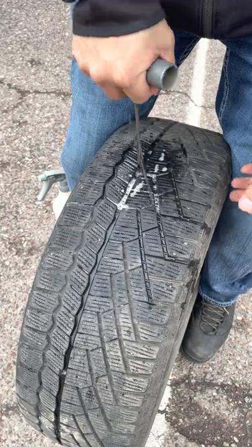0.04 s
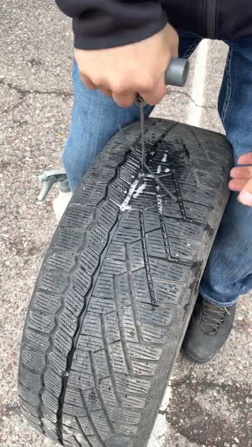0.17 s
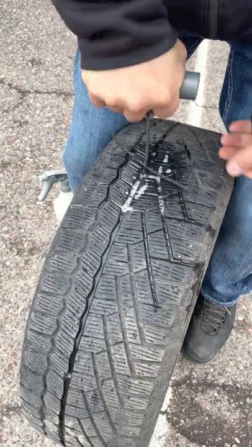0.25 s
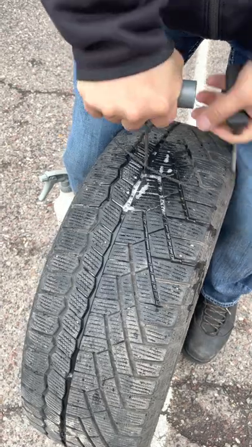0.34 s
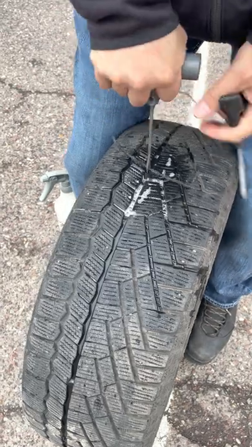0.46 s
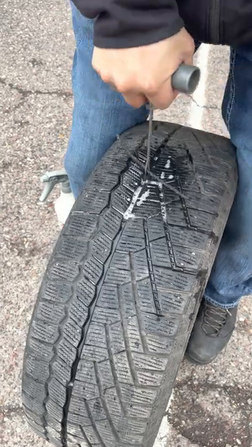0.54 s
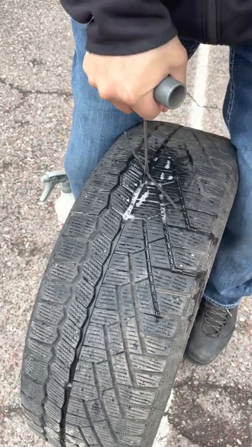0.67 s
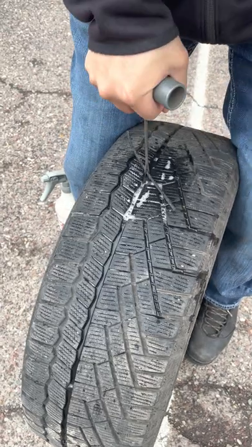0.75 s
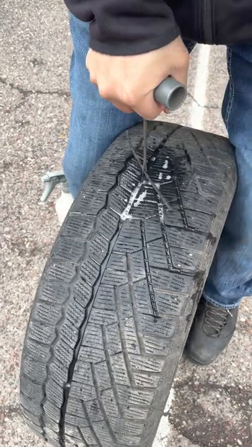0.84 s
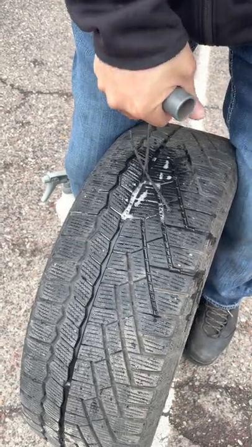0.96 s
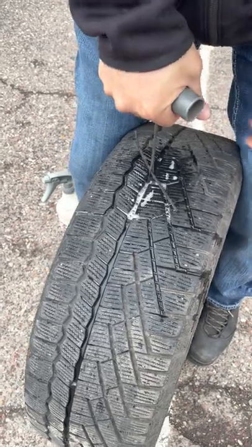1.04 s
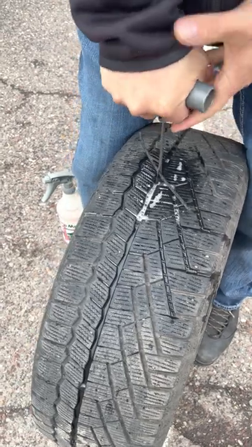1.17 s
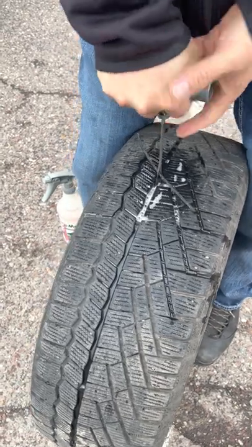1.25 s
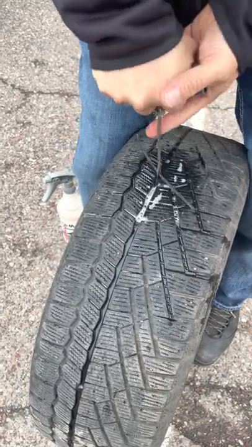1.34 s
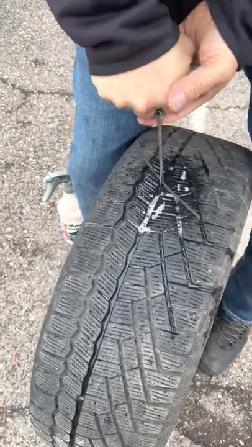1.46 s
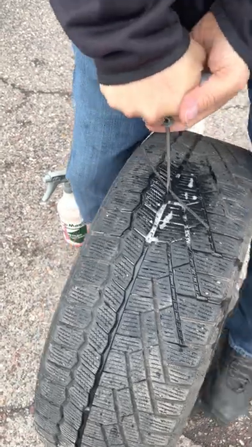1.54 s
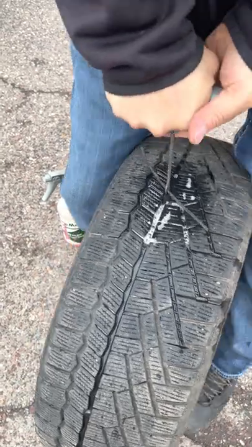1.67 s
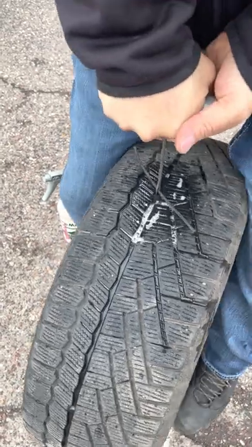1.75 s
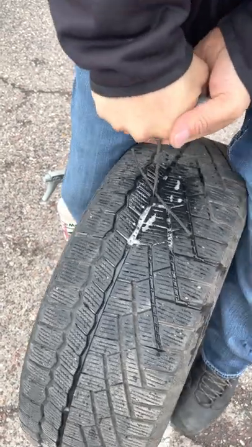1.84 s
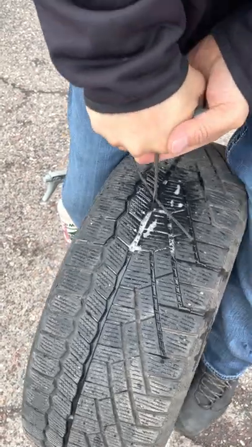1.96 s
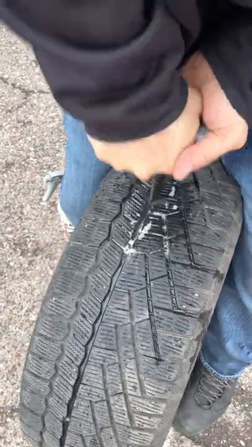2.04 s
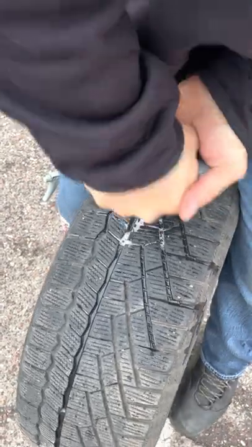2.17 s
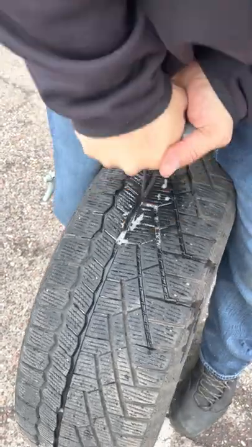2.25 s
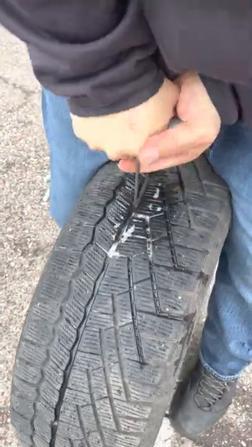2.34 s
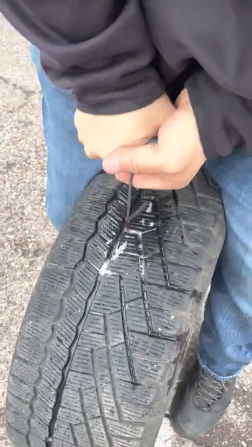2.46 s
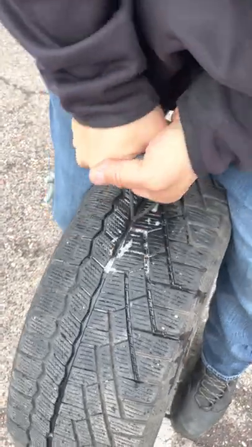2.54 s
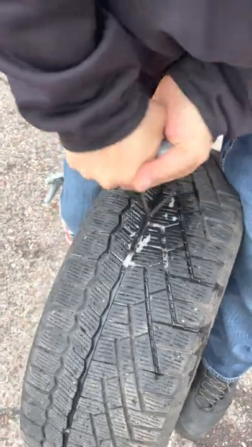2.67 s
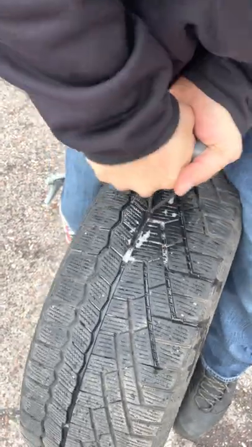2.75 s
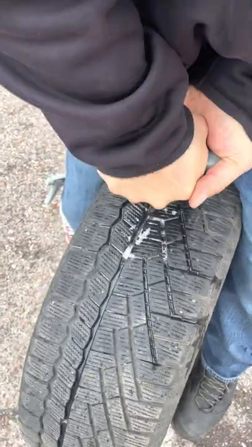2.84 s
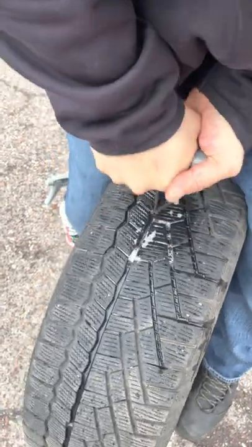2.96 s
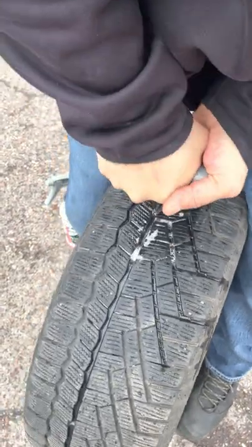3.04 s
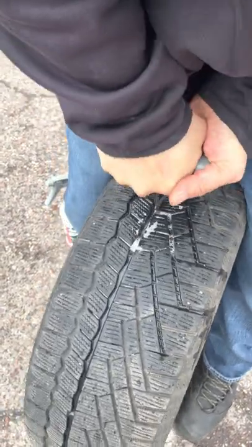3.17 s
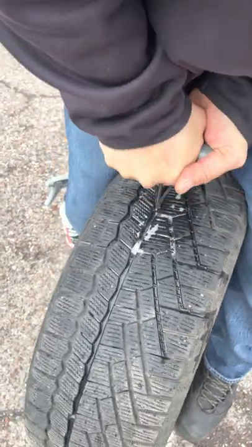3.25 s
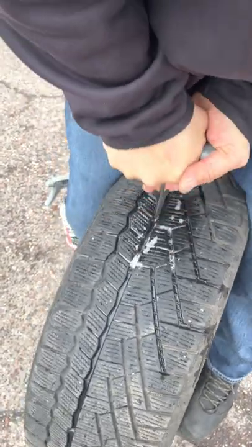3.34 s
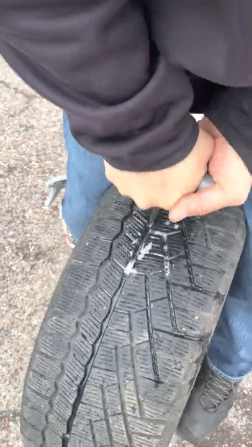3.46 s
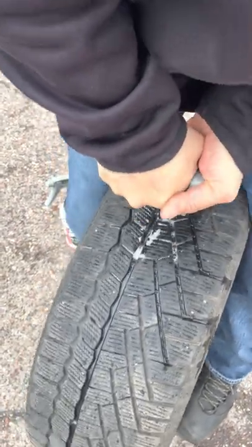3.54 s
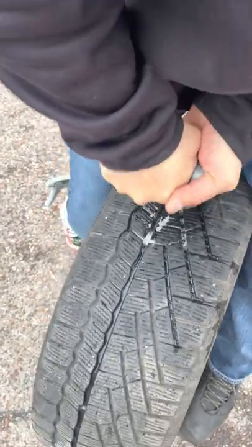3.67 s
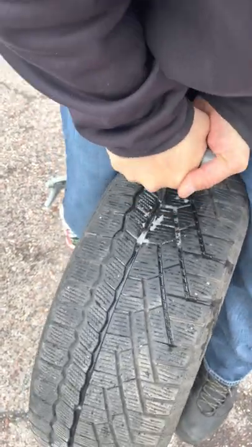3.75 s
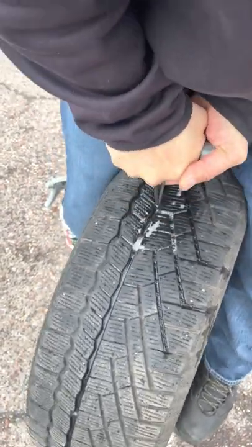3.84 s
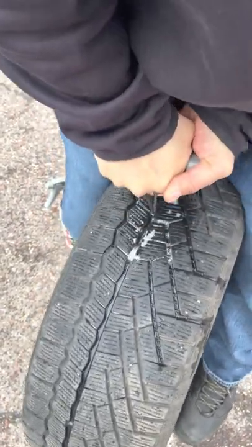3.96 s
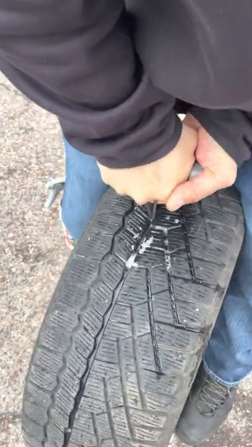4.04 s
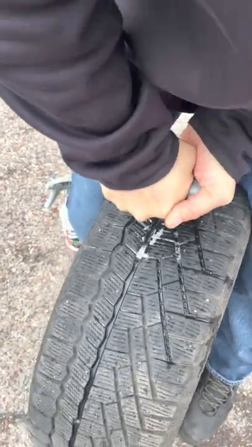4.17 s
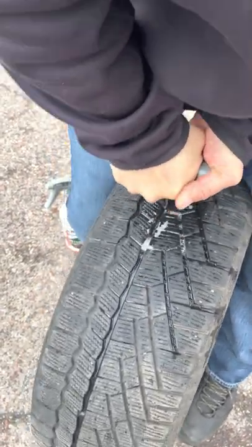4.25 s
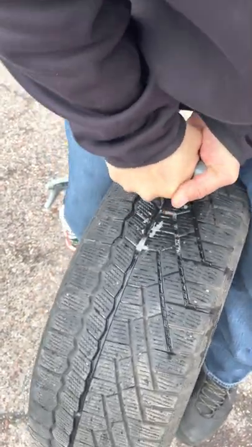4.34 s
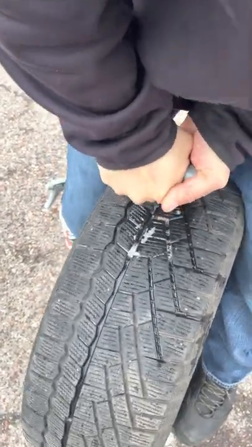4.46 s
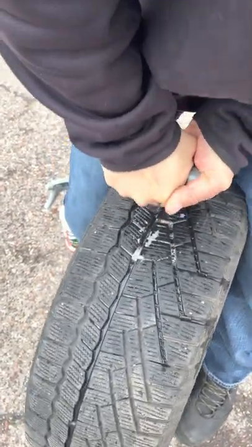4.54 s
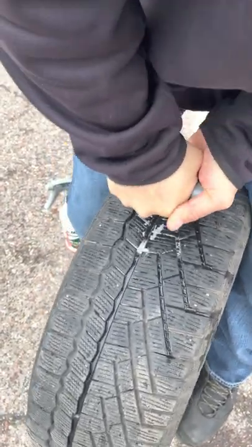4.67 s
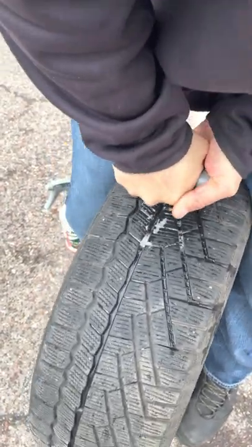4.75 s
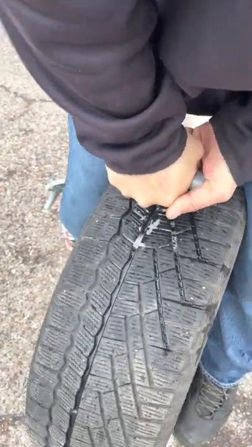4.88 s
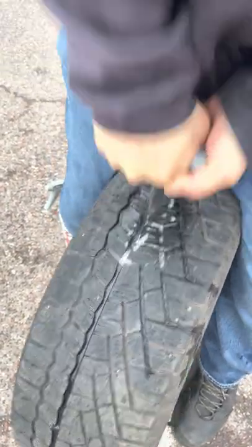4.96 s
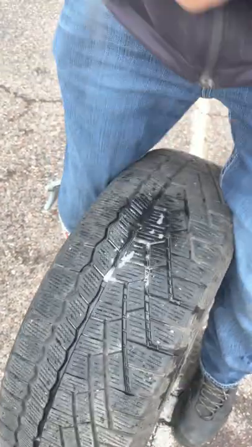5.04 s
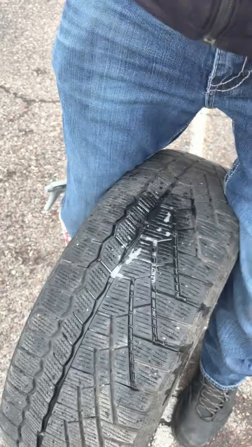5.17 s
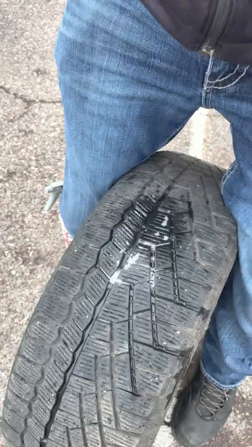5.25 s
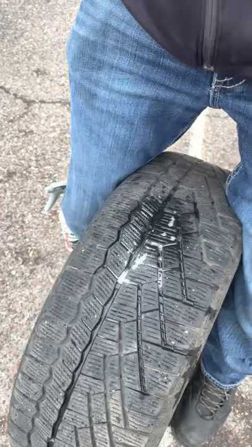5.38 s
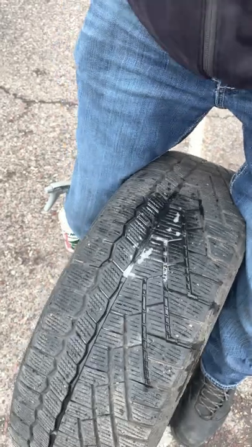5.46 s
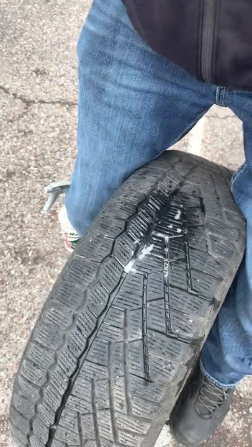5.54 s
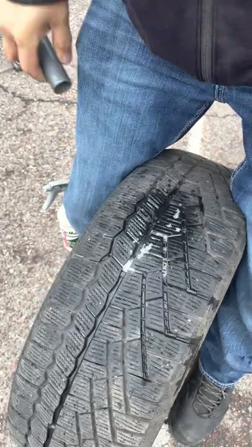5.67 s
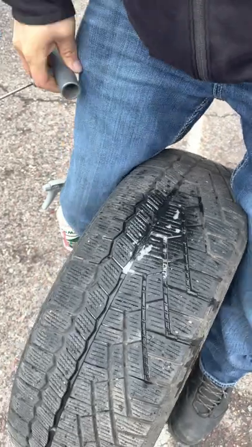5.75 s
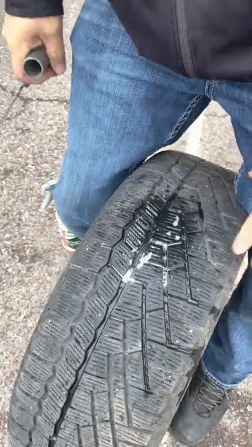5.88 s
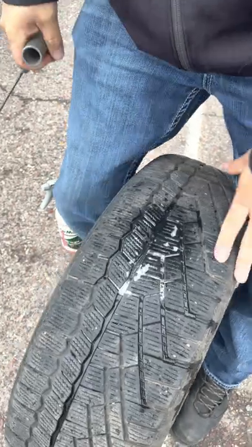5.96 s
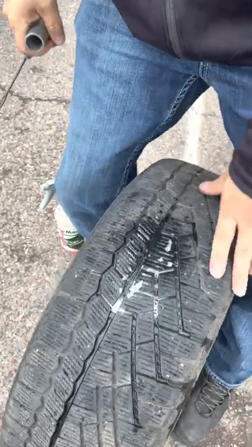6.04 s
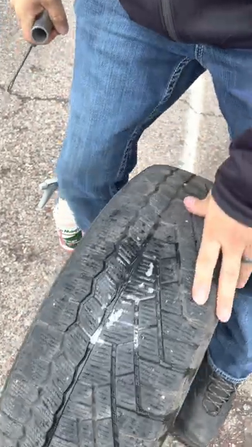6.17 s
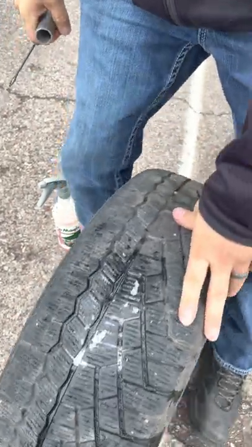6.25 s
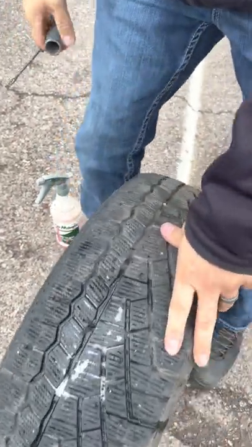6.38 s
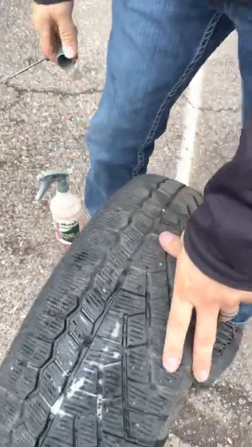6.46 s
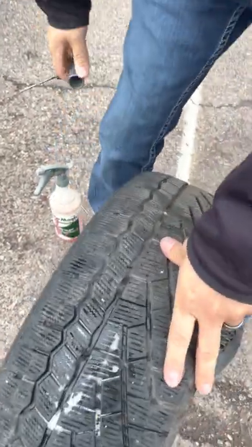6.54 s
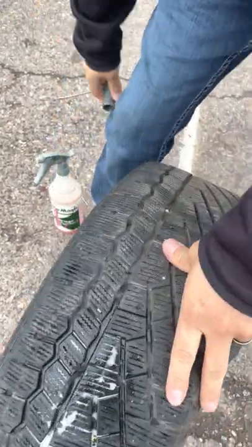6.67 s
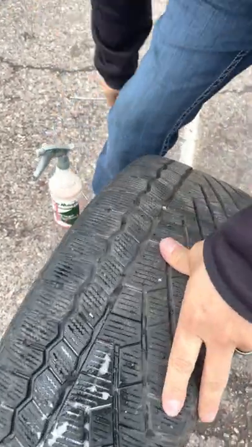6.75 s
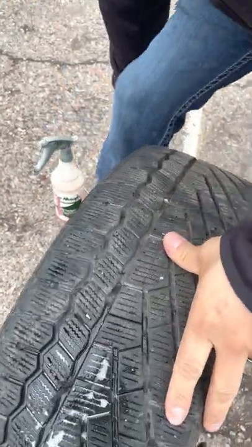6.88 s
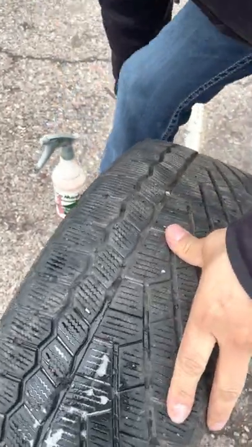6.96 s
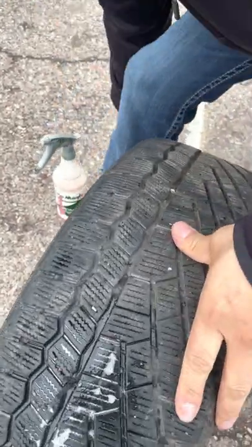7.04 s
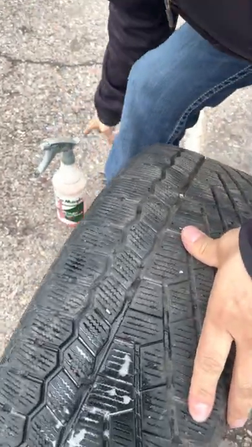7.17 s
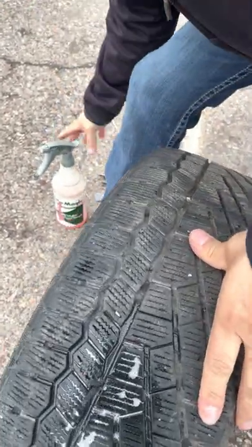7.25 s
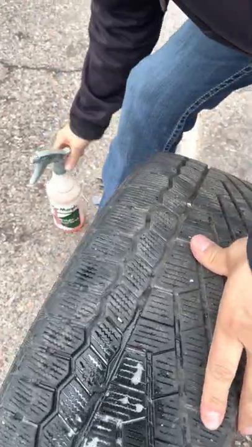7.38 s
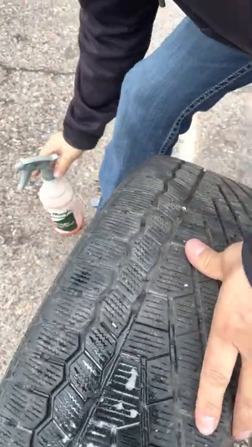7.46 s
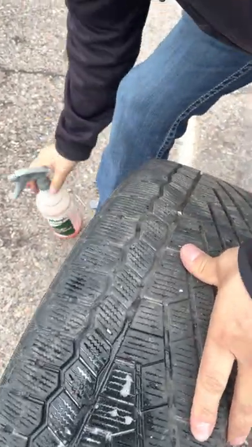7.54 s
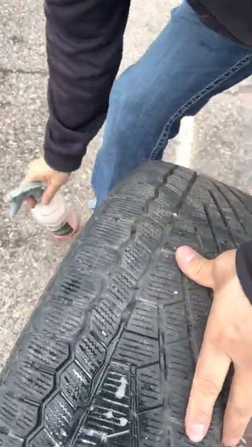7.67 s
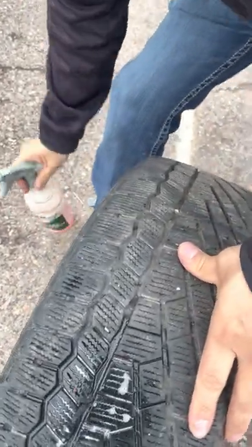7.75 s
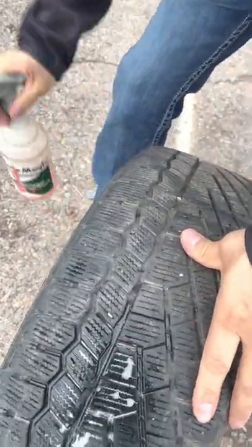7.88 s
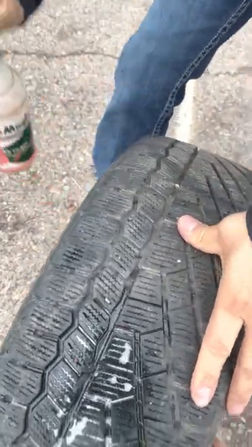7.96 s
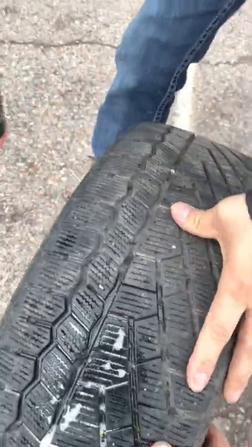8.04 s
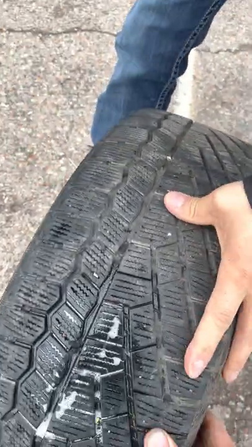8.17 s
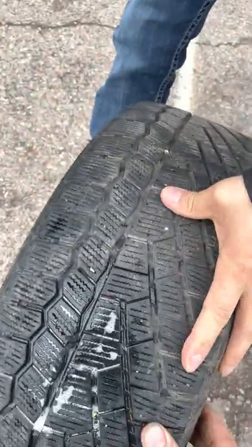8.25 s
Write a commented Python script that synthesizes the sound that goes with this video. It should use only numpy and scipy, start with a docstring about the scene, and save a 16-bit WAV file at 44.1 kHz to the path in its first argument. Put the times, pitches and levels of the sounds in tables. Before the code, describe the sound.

A handheld stereo phone picks up a tyre closely outdoors, its treble slightly phasey, over low distant traffic, a faint engine drone and soft air. From 0 to 2 s, bright pressurised air hisses and sputters unevenly through a wet hole, with dry ticks around 0.9 to 1.3 s. At 2.0 s a sharp wet spit and dull thump end the leak. Small knocks and tiny puffs come around 2.2 to 2.8 s, then near quiet, with a faint spit at 4.5 s. At 4.95 s the steel tool jerks free: a loud hollow pop, deep short boom and fading tyre hum, then a weak squeaky hiss until 5.2 s. A car's soft roar swells about 6.3 s, with a brief wind puff at 6.5 and a thin high whine rising. At 7.04 s the tool hits gritty asphalt, clanking and ringing high, bouncing until 7.5 s. A small plastic click comes at 8.25 s.

```python
"""Beside a punctured car tyre, with distant traffic: air hisses through the wet hole, a filtered noise jet,
until a plug is forced in at 2 s. Near 5 s the steel tool is yanked out: the hole pops, struck modes boom in the
tyre, and the closing hole hisses and squeals. A car, a swell of noise, passes 13.8 m away at 6.3 s; at 7 s the
tool drops on asphalt, a bank of ringing modes, and at 8.3 s a plastic bottle clicks.
The microphone is a hand-held phone with two ports whose treble arrives out of step."""
import sys
import numpy as np
from scipy import signal
from scipy.fft import rfft, irfft, next_fast_len
from scipy.io import wavfile
from scipy.ndimage import uniform_filter1d

SR = 44100
rng = np.random.default_rng(int(sys.argv[2]) if len(sys.argv) > 2 else 0)


def how_loud(loudness_db):
    """Turn decibels into a plain amplitude multiplier (0 dB gives 1, 20 dB gives 10)."""
    steps = np.asarray(loudness_db, float) / 20
    return 10 ** steps


def waveform_to_disk(signal):
    """Save audio, clipped to [-1, 1], as 16-bit WAV at the path in sys.argv[1]."""
    frames = np.transpose(np.atleast_2d(signal))
    scaled = np.clip(frames, -1, 1) * 32767
    samples = np.round(scaled).astype(np.int16)
    wavfile.write(sys.argv[1], SR, samples)


N = 366471
T, F = np.arange(N) / SR, np.fft.rfftfreq(next_fast_len(N), 1 / SR)  # time [s], frequency [Hz]
FFT_SIZE = len(F) * 2 - 2
SIDES = np.array([[1], [-1]])  # left and right port in opposite senses

# Far traffic swells, two stretches in a row: (time [s], level [dB])
TRAFFIC = [
    [(0.0, -54), (2.36, -57), (3.98, -53), (4.48, -53.5), (4.85, -52)],
    [(5.5, -50), (6.8, -49), (7.02, -48), (7.42, -48), (8.31, -48.5)],
]
# Spectrum of the traffic rumble: (frequency [Hz], relative density [dB])
RUMBLE = [(15, -43), (25, -36), (48, -5), (67, -8.5), (97, -9), (124, 2.5), (152, -5.5), (195, -6),
          (352, -15), (436, -14.5), (500, -21), (650, -79), (1100, -120)]
DEEP_DB, DRONE_DB = -4, 1  # rumble below and above 95 Hz, over the traffic level
# Distant engine: (time [s], firing frequency [Hz], level [dB])
ENGINE = [(0, 75.06, -48.5), (.8, 76, -54), (2.4, 80, -57), (3.3, 82.1, -57), (3.88, 80.9, -49.5),
          (4.4, 75.3, -67), (5.5, 65.3, -84), (6.6, 64.5, -62), (7.5, 66.3, -44.5), (8.31, 64.8, -50)]
OCTAVE_DB = -8.5  # octave over the firing tone
# Spectrum of the tyre roar on the road: (frequency [Hz], relative density [dB])
ROAR = [(150, -3.5), (300, -3.5), (600, 4.5), (1000, 2), (1500, -8.5), (2500, -14.5), (5000, -23)]
# nearest moment, distance, speed [m/s], and the roar when nearest, before its flutter and lean
CAR_PASSES_S, CAR_M, CAR_M_S, CAR_DB = 6.34, 13.8, 13.6, -54.5
FAR_ROAR_DB, ROAR_FLUTTER_DB = -77.5, 1.2
# Spectrum of the high whine: (frequency [Hz], relative density [dB])
WHINE = [(2500, -13.5), (3600, -6), (4500, 0), (5100, -5), (5900, -4.5), (7000, -42)]
# Spectrum of the fine tyre hiss that swells with the whine: (frequency [Hz], relative density [dB])
SPRAY = [(5500, -22), (7000, 5), (10000, -2.5), (13000, 2.5), (15500, -16)]
WHINE_FAR_DB, WHINE_NEAR_DB, WHINE_IN_S, WHINE_FADE_S = -67.5, -58, 6.65, 0.53
HUM_HZ, HUM_DB, HUM_IN_S, HUM_FADE_S = 440, -58.5, 6.5, 0.14
# Spectrum of the far hiss: (frequency [Hz], relative density [dB])
AIR = [(500, -32), (1500, 3), (4000, -5), (6500, 4), (10000, 8.5), (13000, 6.5), (15000, -5), (17000, -10)]
AIR_DB = -60.5
CAVITY_DB = -71
GUST_S, GUST_DB, GUST_HALF_S = 6.47, -34, 0.014  # wind across the ports: peak time, level, half length

# Dead modes of the plastic bottle: (frequency [Hz], level [dB])
SNAP = [(3810, -18), (3280, -25), (4700, -33), (5770, -29), (7450, -29)]
SNAP_S, SNAP_LENGTH_S = 8.2538, 0.00064

# Modes of the steel tool: (frequency [Hz], level [dB], t60 [s],
# part [0 handle, 1 shaft, 2 tip, 3 eye, 4 crossbar])
STEEL = [(8830, -2, .4, 0), (8907, 0, .45, 0), (9088, -5, .45, 0), (4729, 0, .27, 4), (3290, -14, .07, 4),
         (5764, -12, .4, 1), (5790, -4, .06, 1), (8498, 0, .3, 1), (14050, -14, .18, 1),
         (14700, -7, .17, 1), (15050, -14, .11, 1), (7390, -2, .12, 2), (9109, 7, .3, 2),
         (10400, -6, .07, 2), (6714, 0, .3, 3), (6760, -1, .05, 1)]
# Landing and bounces: (time [s], handle [dB], shaft [dB], tip [dB], eye [dB], crossbar [dB], grit [dB])
DROPS = [(7.044, -33, -46, -49, -60, -42, -36), (7.054, -32, -44, -49, -54, -23.5, -46),
         (7.177, -62, -64, -42, -54, -60, -50), (7.227, -40, -31, -43, -48, -60, -33),
         (7.367, -60, -37, -66, -35, -70, -45), (7.473, -80, -52, -64, -60, -80, -56)]
GRIT_S = 0.0094  # decay constant of the grit
TUMBLE_DB = 1.5  # spread of each ring's wavering
TWIN_HZ, TWIN_DB, TWIN_T60_S = 4745, -2.5, 0.099  # twin of the crossbar mode

# Dry ticks of tool, hands and grit:
# (time [s], level [dB], low ring [Hz], high ring [Hz], high ring over low [dB])
TICKS = [(.897, -31, 2310, 3600, -3), (.987, -37, 1740, 2900, 4), (.996, -27.5, 2020, 3020, -15),
         (1.259, -28, 4020, 2600, -21), (1.128, -42, 1930, 3200, 0), (2.4546, -35, 1320, 4980, 0),
         (2.506, -42.5, 1520, 2150, -4), (2.803, -42.5, 1400, 2440, -2), (3.25, -50, 3500, 4200, -6),
         (4.9605, -25, 1710, 2550, -17), (4.916, -38, 1530, 4000, -9), (7.044, -25, 1060, 2760, 2),
         (7.046, -29, 393, 1500, 10.5), (7.054, -17.5, 1234, 3130, -1), (7.056, -25.5, 414, 2100, -1),
         (7.178, -30, 1020, 2290, -4), (7.226, -30, 1110, 6460, 13), (7.306, -47, 1936, 3530, 2),
         (7.368, -49, 1070, 10070, 25)]
# crack level; crack top over the high ring: ratio for a -40 dB tick, and growth [octaves per dB]
CRACK_DB, CRACK_SPAN, CRACK_WIDER_PER_DB = -2.5, 2.4, .04

# Modes of the tyre: (frequency [Hz], level [dB], t60 [s], part [0 carcass and air ring, 1 tread])
TYRE = [(113, 0, .17, 0), (225.5, -16.5, 1.45, 0), (160, -4, .06, 0), (262, -10, .06, 0),
        (320, -4, .025, 1), (410, -2, .03, 1), (580, -2, .02, 1), (700, -3, .02, 1), (950, -4, .025, 1),
        (1300, -5, .02, 1), (1700, -4, .02, 1)]
# Blows to the tyre: (start time [s], carcass [dB], tread [dB], half length of the push [s])
THUMPS = [(0.899, -52, -36.5, 0.00046), (2.018, -66, -36, 0.00046), (2.028, -30.5, -34, 0.00036),
          (2.211, -62, -49.5, 0.00044), (2.448, -35, -60, 0.0035), (2.502, -38.5, -64, 0.0018),
          (4.934, -25, -50, 0.0031), (4.9695, -17, -15.5, 0.00057), (4.9714, -7, -35, 0.0016)]
POP_S, POP_LENGTH_S = 4.959, .011
POP_FROM_HZ, POP_TO_HZ, POP_FROM_DB, POP_TO_DB = 2000, 182, -28, -15

# Leak as the hole changes shape: (time [s], air flow [dB], fullness [dB])
LEAK = [(0.0, -25, 2), (0.06, -32, -2), (0.15, -31, 1.5), (0.24, -30.5, 0), (0.36, -29, -2.5),
        (0.44, -36, -0.5), (0.5, -35, -0.5), (0.58, -32.5, 2.5), (0.7, -26, -2), (0.78, -28, -1.5),
        (0.9, -29, -0.5), (1.0, -31.5, 0), (1.1, -31.5, 0), (1.22, -35.5, 0), (1.31, -34, -3),
        (1.39, -29, -4), (1.46, -32, -0.5), (1.56, -31.5, 1), (1.63, -32.5, 2), (1.68, -33.5, -3),
        (1.79, -37.5, 0.5), (1.86, -35, -2), (2.0, -34.5, 0.5)]
# Spectrum of the air jet: (frequency [Hz], relative density [dB])
JET = [(400, -35), (1000, -31), (1900, -30), (2500, -21), (3800, -21), (4500, -22), (5200, -13), (5900, -8),
       (7900, -8), (8700, -4), (10000, -1), (12700, 0), (14100, -2), (16500, -11)]
# Short spits of air and wet rubber: (peak time [s], level [dB], rise [s], fall [s], share of lows [dB])
PUFFS = [(2.02, -20.5, 0.013, 0.0055, -4), (2.034, -18, 0.012, 0.001, -4), (2.21, -57, .01, 0.009, 13),
         (2.33, -57, .005, .006, -10), (2.39, -49.5, 0.018, .012, -2.5), (2.504, -38, .001, 0.0012, -9),
         (2.535, -52.5, 0.045, 0.05, 3), (2.65, -58.5, 0.016, 0.073, 7), (2.775, -58.5, 0.028, 0.043, -2),
         (4.532, -43.5, 0.015, 0.0093, -4), (4.958, -62, 0.016, 0.0038, 29),
         (4.963, -15.5, 0.0042, 0.00072, 1.5), (4.9712, -23.5, 0.0015, 0.00071, 7.5),
         (4.976, -76, 0.0018, 0.031, 41), (5.034, -50.5, 0.023, 0.012, 18.5),
         (5.235, -53.5, .015, 0.021, 8)]
MEAN_FLOW_DB, SEAL_S, SEAL_FADE_S = -27, 2.03, 0.0032
LOW_SPLIT_HZ, SPLIT_HZ = 5000, 8800  # where low rush, middle hiss and top hiss meet
# jet parts: (level over the flow [dB], share of the flow's swings, share of the fullness)
TOP_HISS, MID_HISS, LOW_RUSH = (6.14, 1.0, 0), (-2.14, 0.96, 0.82), (-13.5, 0.94, 1)
CLOSING_S, CLOSING_RISE_S, CLOSING_HOLD_S, CLOSING_FALL_S, CLOSING_DB = 5.1, 0.06, 0.034, 0.023, -46.5
SQUEAL_HZ, SQUEAL_OCTAVES, SQUEAL_DB, SQUEAL_S = 10470, 0.47, -49, 0.008  # length is the typical half length

# Part of the jet that moving hands scatter unlike to the two ports: (frequency [Hz], gain [dB])
SCATTER = [(500, 1), (2500, -28), (4400, -16), (8000, -7.5), (8800, -23), (10600, -25.5), (11300, -11.5),
           (16000, -12)]
# Phase between the ports, for near sources only: (frequency [Hz], phase [half turns])
NEAR = [(3200, 0), (4000, .45), (4400, .75), (4750, 1.25), (5200, 1.65), (5850, 2)]
# Phase between the ports, for every sound: (frequency [Hz], phase [half turns])
PORTS = [(5850, 0), (7250, .5), (9000, .85), (9500, 1), (10750, 1), (12000, 1.33), (13000, 1.5),
         (14000, 1.72), (15000, 2)]
TOP_HZ = 15900  # above it the microphone hears next to nothing


def level(x, db):
    """Scale to an rms level."""
    return x * how_loud(db) / np.sqrt(np.mean(x ** 2))


def curve(table):
    """Columns of a time table at every sample."""
    s, *columns = np.transpose(table)
    return [np.interp(T, s, c) for c in columns]


def shape(points):
    """Gain at every frequency for (Hz, dB) points, 120 dB down outside them."""
    hz, db = np.transpose(points)
    return how_loud(np.interp(np.log(F + 1), np.log(hz), db, -120, -120))


def walk(rate):
    """Random levels held 1 / rate s and slewed twice; spread near 1."""
    k = int(SR / rate)
    steps = np.repeat(rng.standard_normal(N // k + 1), k)
    return 0.963 * uniform_filter1d(uniform_filter1d(steps, k), k)[:N]


def noise(points, lo_hz=1, hi_hz=20000):
    """Coloured noise inside a band."""
    white = rng.standard_normal(FFT_SIZE)
    return irfft(rfft(white) * shape(points) * (F >= lo_hz) * (F < hi_hz))[:N]


def spread(points, wide):
    """Two-channel noise: a middle of rms 1 and a side part that is a share of it."""
    return level(noise(points), 0) + wide * level(noise(points), 0) * SIDES


def ring(x, hz, t60):
    """One decaying mode; a unit blow rings with peak near 1."""
    pole = np.exp(2j * np.pi * hz / SR - np.log(1000) / (t60 * SR))
    return signal.lfilter([1], [1, -pole], x).imag


def add(out, s, burst):
    """Mix a burst in at time s."""
    i = int(s * SR)
    out[i:i + len(burst)] += burst[:N - i]


def fade_in(s, length):
    """A smooth step from 0 to 1 around time s."""
    return 1 / (1 + np.exp(np.clip((s - T) / length, -50, 50)))


def swell(s, rise, fall):
    """A rounded rise to time s and an exponential fall."""
    return np.exp(-np.where(T < s, ((s - T) / rise) ** 2, (T - s) / fall))


def turn(points):
    """Opposite phase turns for the two ports."""
    hz, half_turns = np.transpose(points)
    return np.exp(.5j * np.pi * np.interp(F, hz, half_turns) * SIDES)


def place(x, pan_db, echo_db):
    """A near source leans to one port below the treble; its short ground echo differs at each port."""
    lean = how_loud(pan_db / 2 * SIDES / (1 + (F / 5500) ** 8))  # positive leans left
    tail = rng.standard_normal((2, 1200)) * np.exp(-np.arange(1200) / SR / .003)
    echo_band = 1 / (1 + (700 / (F + 1)) ** 2) / (1 + (F / 5000) ** 4)
    echo = how_loud(echo_db) * rfft(tail, FFT_SIZE) * echo_band
    return irfft(rfft(x, FFT_SIZE) * (lean * turn(NEAR) + echo))[:, :N]


def far_air():
    """Far hiss alike at both ports, and a fainter hiss opposite in the two."""
    far = level(noise(AIR), AIR_DB) * how_loud(0.21 * walk(5.23) + 1.3 * walk(30))
    apart = level(noise([(600, -18.0), (3000, -4), (5500, -22.0), (6500, -3)]), -68.5)
    return far + apart * SIDES


def traffic():
    """Distant traffic: deep and droning rumble that swell together and waver apart."""
    traffic_db, = curve(TRAFFIC[0] + TRAFFIC[1])
    deep = level(noise(RUMBLE, 1, 95), 0) * how_loud(traffic_db + DEEP_DB + 0.56 * walk(0.71))
    drone = level(noise(RUMBLE, 95), 0) * how_loud(traffic_db + DRONE_DB + 1.1 * walk(5))
    return deep + drone


def engine():
    """Firing tone and its octave, unsteady in pitch and strength."""
    hz, db = curve(ENGINE)
    phase = 2 * np.pi * np.cumsum(hz * (1 + 0.0293 * walk(15))) / SR
    firing = how_loud(db + 3.7 * walk(12)) * np.sin(phase)
    octave = how_loud(db + OCTAVE_DB + 2.7 * walk(4.87)) * np.sin(2 * phase)
    return firing + octave


def hum():
    """A faint far drone, a sine unsteady in pitch and strength, fades in."""
    phase = 2 * np.pi * np.cumsum(HUM_HZ * (1 + 0.00512 * walk(2.5))) / SR
    return how_loud(HUM_DB + 2 * walk(18)) * fade_in(HUM_IN_S, HUM_FADE_S) * np.sin(phase)


def whine():
    """A high band of noise and a fine tyre hiss swell late."""
    whine_db = WHINE_FAR_DB + (WHINE_NEAR_DB - WHINE_FAR_DB) * fade_in(WHINE_IN_S, WHINE_FADE_S)
    return how_loud(whine_db + 0.91 * walk(20)) * (spread(WHINE, 0.71) + level(noise(SPRAY), -0.3))


def road_roar():
    """A wide tyre roar leaning left: far roar plus a car whose level falls as 1 / distance."""
    car = how_loud(CAR_DB) * CAR_M / np.hypot(CAR_M, CAR_M_S * (T - CAR_PASSES_S))
    flutter_and_lean = how_loud(ROAR_FLUTTER_DB * walk(13) + 2.85 * SIDES)
    return np.hypot(car, how_loud(FAR_ROAR_DB)) * flutter_and_lean * spread(ROAR, 0.84)


def cavity():
    """Street noise keeps the air ring in the tyre humming: steady noise through that one mode."""
    hz, _, t60, _ = TYRE[1]
    return level(ring(rng.standard_normal(N), hz, t60), CAVITY_DB)


def gust():
    """A breath of wind across the ports, a burst of low noise opposite in the two."""
    wind = level(noise([(60, -1), (500, -3), (2000, -20), (7000, -37)]), GUST_DB)
    return wind * np.exp(-((T - GUST_S) / GUST_HALF_S) ** 2) * SIDES


def street():
    """All the background; rumble and engine lean slightly left."""
    low = (traffic() + engine()) * how_loud(0.33 * SIDES)
    return low + road_roar() + whine() + hum() + cavity() + far_air() + gust()


def snap():
    """The bottle clicks as it is lifted: dead modes swell and fade within milliseconds."""
    modes = sum(how_loud(db) * np.sin(2 * np.pi * hz * T) for hz, db in SNAP)
    return modes * swell(SNAP_S, SNAP_LENGTH_S, SNAP_LENGTH_S)


def tool():
    """Each bounce strikes every part and mode differently; rings waver as it turns; grit cracks under it."""
    out = np.zeros(N)
    luck_db = rng.standard_normal((len(DROPS), len(STEEL)))
    for k, (hz, db, t60, part) in enumerate(STEEL):
        blows = np.zeros(N)
        for (s, *part_db), chance_db in zip(DROPS, luck_db):
            blows[int(s * SR)] = how_loud(db + part_db[int(round(part))] + chance_db[k])
        out = out + ring(blows, hz, t60) * how_loud(TUMBLE_DB * walk(50))
    for (s, *_, grit_db), white in zip(DROPS, rng.standard_normal((len(DROPS), 2000))):
        add(out, s, how_loud(grit_db) * np.diff(white) * np.exp(-T[:1999] / GRIT_S))
    return out


def twin():
    """The twin mode beats against its partner, so the ring seems to swing from port to port."""
    blows = np.zeros(N)
    for s, *_, bar_db, _grit_db in DROPS:
        blows[int(s * SR)] = how_loud(bar_db + TWIN_DB)
    return ring(blows, TWIN_HZ, TWIN_T60_S)


def ticks():
    """Three short dull rings and a crack of noise at each contact; harder ones crack brighter and longer."""
    out, t = np.zeros(N), np.arange(2000) / SR
    blow = t == 0
    for (s, db, low_hz, high_hz, high_db), white in zip(TICKS, rng.standard_normal((len(TICKS), 2000))):
        body = ring(blow, low_hz, 17 / low_hz)
        body = body + how_loud(-7.5) * ring(blow, 1.64 * low_hz, 0.0056)
        body = body + how_loud(high_db) * ring(blow, high_hz, 0.0066)
        top_hz = min(high_hz * CRACK_SPAN * 2 ** (CRACK_WIDER_PER_DB * (db + 40)), 18000)
        band = signal.butter(2, [0.56 * low_hz, top_hz], "band", fs=SR, output="sos")
        crack = signal.sosfilt(band, white * np.exp(-t / (0.0013 + 0.12 * how_loud(db))))
        add(out, s, how_loud(db) * (body + how_loud(CRACK_DB) * crack / abs(crack).max()))
    return out


def pop():
    """A few growing cycles, each longer than the last, as the tool leaves the hole."""
    done = np.clip((T - POP_S) / POP_LENGTH_S, 0, 1)
    period = 1 / POP_FROM_HZ + (1 / POP_TO_HZ - 1 / POP_FROM_HZ) * done
    phase = 2 * np.pi * np.cumsum((done > 0) / period) / SR
    edges = np.clip(np.minimum(done, 1 - done) * 12, 0, 1)
    return how_loud(POP_FROM_DB + (POP_TO_DB - POP_FROM_DB) * np.sqrt(done)) * np.cos(phase) * edges


def tyre():
    """Smooth pushes ring the carcass, the ring of air inside it and the dead tread blocks."""
    force = np.zeros((2, N))
    for s, carcass_db, tread_db, half_length in THUMPS:
        push = np.hanning(max(int(2 * half_length * SR), 4))
        add(force[0], s, -how_loud(carcass_db) * push / push.sum())
        add(force[1], s, -how_loud(tread_db) * push / push.sum())
    body = sum(how_loud(db) * ring(force[int(round(part))], hz, t60) for hz, db, t60, part in TYRE)
    # a body this small radiates no deep bass
    return signal.sosfilt(signal.butter(2, 80, "high", fs=SR, output="sos"), body)


def squeaks(count=12):
    """Short unsteady whistles at chance moments, pitches and strengths while the hole closes."""
    out = np.zeros(N)
    chances = rng.standard_normal((count, 4))
    for (late, high, strong, long), jitter in zip(chances, rng.standard_normal((count, 4000))):
        window = np.hanning(int(2 * SQUEAL_S * 2 ** np.clip(0.53 * long, -1.5, 1.5) * SR))
        unsteady = 1 + 0.17 * uniform_filter1d(jitter, size=40)[:len(window)]
        pitch = SQUEAL_HZ * 2 ** np.clip(SQUEAL_OCTAVES * high, -.6, .45) * unsteady
        whistle = window * np.sin(2 * np.pi * np.cumsum(pitch) / SR)
        s = CLOSING_S + .5 * late * CLOSING_RISE_S
        add(out, s - SQUEAL_S, how_loud(SQUEAL_DB + 4.1 * strong) * whistle)
    return out


def leak():
    """A turbulent jet sputters through soapy water, its lower parts following the flow less closely."""
    flow_db, full_db = curve(LEAK)
    sputter_db = walk(60.93) + walk(300)
    low = level(noise(JET, 1, LOW_SPLIT_HZ), 0) * how_loud(1.2 * walk(30.11) + 0.91 * walk(150))
    mid = level(noise(JET, LOW_SPLIT_HZ, SPLIT_HZ), 0) * how_loud(1.4 * walk(31.34) + 0.94 * walk(8.13))
    top = level(noise(JET, SPLIT_HZ), 0)
    jet = np.zeros(N)
    for (db, share, fills), part in ((TOP_HISS, top), (MID_HISS, mid), (LOW_RUSH, low)):
        part_db = MEAN_FLOW_DB + db + share * (flow_db - MEAN_FLOW_DB) + fills * full_db
        jet += how_loud(part_db + sputter_db) * part
    jet *= np.clip((SEAL_S - T) / SEAL_FADE_S, 0, 1)  # the plug seals the hole
    for s, db, rise, fall, lows_db in PUFFS:
        spit = top + how_loud(-9.5 + lows_db / 2) * mid + how_loud(-14.5 + lows_db) * low
        jet += how_loud(db) * swell(s, rise, fall) * spit
    # the wet hole closes round the plug: a rise, a hold and a fall
    closing_rise = swell(CLOSING_S, CLOSING_RISE_S, 1)
    closing_fall = swell(CLOSING_S + CLOSING_HOLD_S, 1, CLOSING_FALL_S)
    closing = how_loud(CLOSING_DB + 3 * walk(70) + 4 * walk(400)) * np.minimum(closing_rise, closing_fall)
    return jet + closing * (top + how_loud(-6) * mid + how_loud(-11.5) * low)


def scattered_leak():
    """Moving hands scatter part of the jet, an independent draw of it, in opposite senses to the ports."""
    part = irfft(rfft(leak(), FFT_SIZE) * shape(SCATTER))[:N]
    return how_loud(3.1 * walk(3.55)) * part * SIDES


def scene():
    """The tyre in front, the dropped tool off to the left, the street all round."""
    dropped = place(tool(), 3, -36) + place(twin(), 3, -36) * SIDES
    handling = place(ticks(), -.6, -21) + place(snap(), 0.5, -30)
    struck = place(tyre(), 0.38, -10) + place(pop(), 2.9, -21)
    air = place(leak() + squeaks(), -0.16, -22.0) + scattered_leak()
    return street() + dropped + handling + struck + air


def band_limit(x):
    """A steep low-pass at the top of the band."""
    return signal.sosfilt(signal.butter(12, 17060, fs=SR, output="sos"), x)


def record(dry):
    """The ports turn the treble in opposite senses, so the middle cancels near 10 kHz; both ends are cut."""
    x = 1j * F / 40
    bass_cut = x ** 2 / (1 + 1.4 * x + x ** 2)
    treble_cut = 0.0047 + 0.87 * (F < TOP_HZ)
    mix = irfft(rfft(dry, FFT_SIZE) * bass_cut * treble_cut * turn(PORTS))[:, :N]
    return band_limit(mix)


dry = scene()
out = record(dry)
waveform_to_disk(out)
```